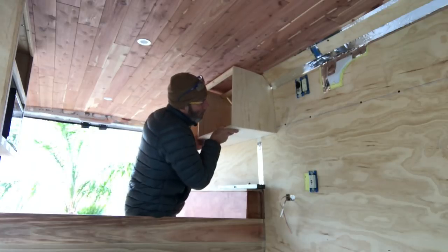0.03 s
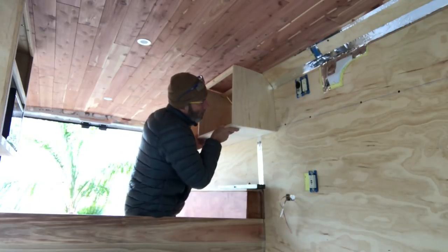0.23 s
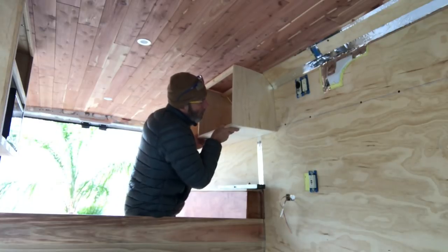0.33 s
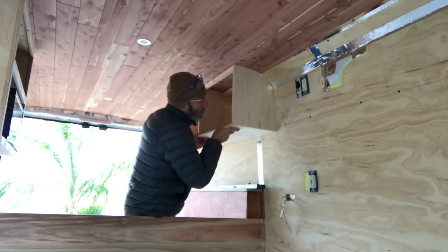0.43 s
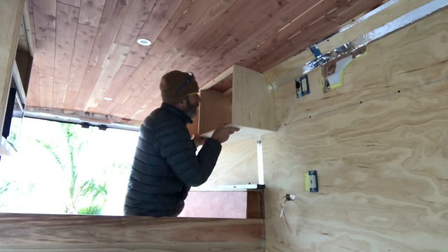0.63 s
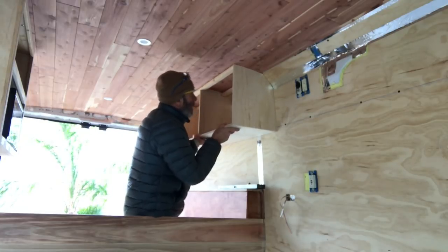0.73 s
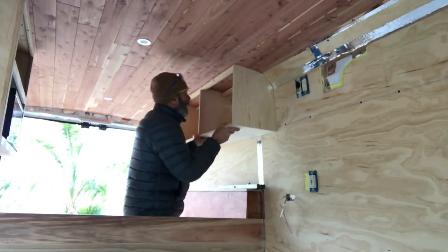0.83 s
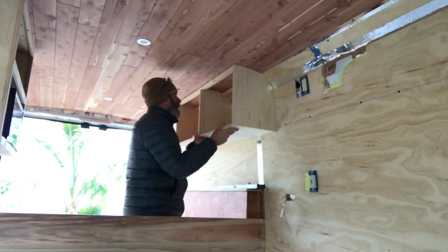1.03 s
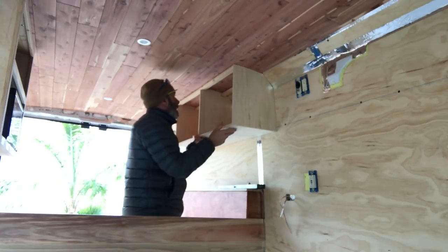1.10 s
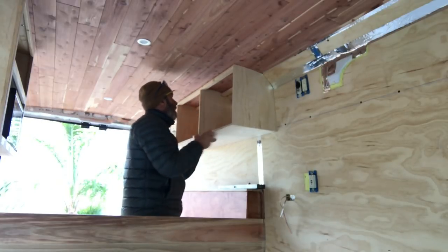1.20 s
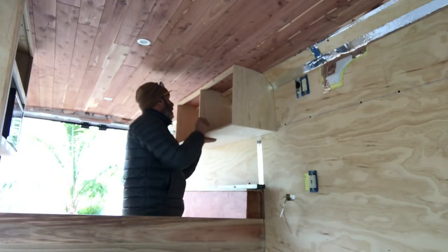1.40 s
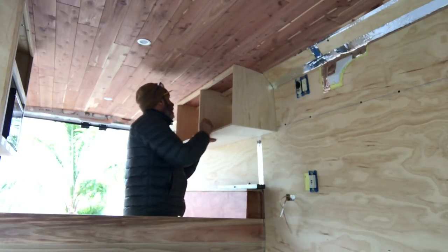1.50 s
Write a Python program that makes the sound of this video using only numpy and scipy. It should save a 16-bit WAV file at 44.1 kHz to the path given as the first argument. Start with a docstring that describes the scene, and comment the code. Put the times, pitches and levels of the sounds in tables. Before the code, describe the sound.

Two dull, clustered wooden knocks about a quarter second apart, with small scrapes around them, then quiet nylon rustling, low floor rumble and a late light tap over faint outdoor hiss; short dry room, mono microphone.

```python
"""Plywood box in a wooden cabin

A plywood box is pushed against the wall and ceiling of a small cabin: slips shake it and rasp, two knocks ring
box and panelling as sums of decaying modes, and light taps ring the pressed box. A padded jacket rustles in
shaped, patchy noise; floor and bodywork rumble in swelling low noise, over a quiet outdoor hiss.
A short decaying noise tail gives the room's answer to the wood.
"""
import sys
import numpy as np
from scipy import signal
from scipy.fft import rfft, irfft, next_fast_len
from scipy.io import wavfile
from scipy.ndimage import uniform_filter1d, map_coordinates

SR = 44100
rng = np.random.default_rng(int(sys.argv[2]) if len(sys.argv) > 2 else 0)


def output_pcm(signal):
    """Save a mono or channel-first signal as 16-bit PCM at the path in sys.argv[1].

    Samples are clipped to [-1, 1] before scaling.
    """
    pcm = np.clip(np.atleast_2d(signal).T, -1, 1) * 32767
    wavfile.write(sys.argv[1], SR, np.round(pcm).astype(np.int16))


def gain_from_db(level_db):
    """Convert decibel levels to linear amplitude factors (20 dB per decade)."""
    decades = np.asarray(level_db, float) / 20
    return 10 ** decades


N = 68355  # samples

# Contacts of the box with the panelling: t/s, box level/dB, wall level/dB, ceiling level/dB, contact/ms
CONTACTS = [(0.2269, -62, -24.5, -77, 0.41), (0.2308, -16.5, -27.5, -77, 1.06),
            (0.2405, -23.5, -24, -79, 1.36), (0.2571, -35, -33.5, -75, 0.48), (0.283, -37.5, -49, -78, 2.5),
            (0.467, -31.5, -68, -38.5, 0.38), (0.4731, -13.5, -63, -17, 1.47),
            (0.4807, -25, -40, -32.5, 0.37), (0.4955, -22.5, -62, -29.5, 1.07),
            (.518, -26.5, -79, -32, 1.35), (0.533, -47, -66, -35, 1.44), (0.604, -45.5, -78, -42, 2.1)]
# Modes of the hollow box, the wall panel and the ceiling boards: f/Hz, level/dB, t60/s
BOX_MODES = [(109, -13.5, 0.059), (250, 0, .14), (860.6, -20, 0.15), (1010, -16.5, 0.034), (1340, -17, .05)]
WALL_MODES = [(43.6, -34, 0.23), (176, -4.5, 0.23), (236, -11, 0.02), (310.5, 0.5, 0.048),
              (398, -13, 0.027), (673, -8.5, 0.04), (828, -6.5, 0.021), (950, -4, 0.013), (1105, -30, 0.11),
              (2230, -14, 0.047)]
CEILING_MODES = [(71.1, -9.5, 0.38), (151, 1.5, 0.046), (185.6, 1, 0.072), (384, -12, 0.077),
                 (578, -2.5, 0.058), (687, -4, 0.017), (1046, -7.5, 0.067), (1150, 0, .04),
                 (1320, -15.5, 0.082), (1556, -10, 0.17)]
# Dry crack of a contact, relative spectral density: f/Hz, level/dB
CRACK_SPECTRUM = [(200, -18), (500, -10), (1000, -21), (1700, -19.5), (2600, -43), (8000, -45),
                  (15000, -60)]
# Box sliding on wood: t/s, shudder level/dB, rasp level/dB
SLIDE_MOTION = [(0, -61.5, -53.5), (.05, -63, -66), (.075, -78, -66.5), (.145, -63, -77), (.17, -47.5, -59),
                (.2, -45.5, -59), (.215, -45, -50), (.225, -66, -53), (.25, -26, -46), (.265, -67, -53.5),
                (.28, -49.5, -84), (.39, -75, -84), (.41, -78, -60.5), (.44, -76, -50), (.462, -72, -50),
                (.475, -65, -46.5), (.51, -51, -63), (.56, -75, -69)]
# Rasp of the surface, relative spectral density: f/Hz, level/dB
RASP_SPECTRUM = [(300, -54), (600, -28), (1020, 2), (1400, -6), (2000, -10), (2900, -12), (4500, -20),
                 (9000, -29), (14000, -53)]
# Modes of the box pressed on the wall: f/Hz, level/dB, t60/s
PRESSED_BOX_MODES = [(268, 0, .09), (320, -2, .06), (440, -11, .04), (720, -15, .04)]
# Light taps of the box held against the wall: t/s, level/dB
LIGHT_TAPS = [(.011, -40), (0.034, -41.5), (.047, -55.5), (1.364, -43), (1.382, -55), (1.398, -48.5)]
# Decay of the cabin: f/Hz, t60/s
CABIN_DECAY = [(100, .18), (500, .13), (3000, .09)]
# Jacket movement: t/s, level/dB, tilt (treble over middle)/dB
JACKET_MOTION = [(0, -53, -2.5), (.04, -60, -5), (.09, -63, -4.5), (.2, -60.5, -4), (.235, -58, 15),
                 (.27, -71, -24), (.34, -60, -2), (.44, -58.5, 4), (.51, -64.5, -5), (.575, -57, 1),
                 (.595, -52.5, -1), (.62, -50.5, 2), (.655, -58, -3), (.8, -57.5, -3), (.82, -56.5, 3.5),
                 (.88, -56, 0), (.9, -60, -6.5), (.96, -57.5, -4), (.99, -52, 4.5), (1.018, -57.5, -1),
                 (1.048, -55, -4.5), (1.12, -60, -3), (1.155, -56.5, -5), (1.24, -57.5, 1.5),
                 (1.28, -54.5, 0.5), (1.33, -60.5, 0.5), (1.358, -54, -1), (1.376, -51.5, -1),
                 (1.424, -60, -4.5), (1.476, -52.5, 11), (1.514, -57.5, 8), (1.55, -56, 9)]
# Jacket cloth, relative spectral density: f/Hz, level/dB
CLOTH_SPECTRUM = [(150, -28.5), (300, -2.5), (600, -6.5), (900, -6.5), (1400, -8), (2200, -9.5),
                  (5800, -12.5), (15500, -24.5)]
# Low lumps of floor and bodywork: t/s, level/dB
RUMBLE_LEVEL = [(0, -50), (.09, -58), (.17, -67), (.25, -42), (.37, -48.5), (.41, -55), (.5, -35),
                (.62, -52.5), (.66, -53.5), (.85, -52.5), (.93, -54.5), (1.02, -55), (1.07, -56),
                (1.12, -49.5), (1.2, -64), (1.28, -50), (1.33, -74), (1.375, -44), (1.42, -64),
                (1.447, -45.5), (1.48, -70), (1.55, -45)]
# Tone of the rumble, relative spectral density: f/Hz, level/dB
RUMBLE_SPECTRUM = [(12, -25), (20, 5.5), (49, 8.5), (81, -2), (113, -20), (250, -13.5), (320, -58),
                   (550, -120)]
# Outdoor air, relative spectral density: f/Hz, level/dB
AIR_SPECTRUM = [(47, -7), (80, -2.5), (328, -16.5), (446, -39), (532, -18), (607, -16.5), (678, -21.5),
                (1100, -29), (1180, -18.5), (1280, -27), (3030, -31), (15500, -30.5)]
# Microphone colour: f/Hz, level/dB
MIC_COLOUR = [(4000, 1.5), (4900, -1), (5600, 0.5), (7000, 1), (8300, -2.5), (9400, -2), (10300, -5.5),
              (11300, -2.5), (14500, -5), (15600, -5)]

MODE_SCATTER_DB = 1  # standard deviation from contact to contact
CRACK_DB, CRACK_T60_S = -13.5, 0.087  # level against the loudest body
SLIPS_PER_S, SLIP_SPREAD_DB = 2500, 3
TAP_WIDTH_S = 0.000625  # from the peak of the push to 1/e
CABIN_DB, AIR_DB = -13, -59
CLOTH_SPLIT_HZ = 6600
MIC_LOW_HZ = 42.3


def unit(x):
    """x scaled to rms 1."""
    return x / np.sqrt(np.mean(x ** 2) + 1e-20)


def along(points, hz):
    """Reads (frequency, value) points on a log frequency axis."""
    f, v = np.transpose(points)
    return np.interp(np.log(hz + 1), np.log(f + 1), v)


def curves(rows):
    """One value per sample for each column after the time."""
    s, *columns = np.transpose(rows)
    return [np.interp(np.arange(N) / SR, s, column) for column in columns]


def wobble(rate):
    """A smooth random curve, rate knots a second."""
    knots = rng.standard_normal(int(N * 200 / SR) + 4)
    return map_coordinates(knots, [np.arange(N) * rate / SR])


def filtered(x, response):
    """x times a response of frequency."""
    size = next_fast_len(N + SR // 2)
    hz = np.fft.rfftfreq(size, 1 / SR)
    return irfft(rfft(x, size) * response(hz), size)[:N]


def coloured(x, spectrum):
    """x filtered by the given spectrum, rms 1."""
    return unit(filtered(x, lambda hz: gain_from_db(along(spectrum, hz))))


def patchy(patchy_db):
    """White noise with patches of random gain in time and frequency."""
    z = signal.stft(rng.standard_normal(N + 512), nperseg=256)[2]
    field = uniform_filter1d(rng.standard_normal(z.shape), size=5, axis=0)
    field = uniform_filter1d(field, size=8, axis=1)
    return signal.istft(z * gain_from_db(patchy_db * unit(field)), nperseg=256)[1][:N]


def ring(modes, scatter_db):
    """Answer of a wooden body to one unit blow; neighbouring modes start in opposite directions."""
    t = np.arange(SR // 2) / SR
    answer = np.zeros(len(t))
    for k, ((hz, db, t60), scatter) in enumerate(zip(modes, scatter_db)):
        decay = gain_from_db(db + scatter - 60 * t / t60)
        answer += (-1) ** k * decay * np.sin(2 * np.pi * hz * t)
    return answer


def knocks():
    """Rounded pushes ring box and panelling, with a dry crack; a longer contact is duller."""
    out, t = np.zeros(N + SR), np.arange(SR // 2) / SR
    bodies = (BOX_MODES, WALL_MODES, CEILING_MODES)
    scatter_db = MODE_SCATTER_DB * rng.standard_normal((len(CONTACTS), 3, len(WALL_MODES)))
    for (s, *levels_db, contact_ms), scatter in zip(CONTACTS, scatter_db):
        u = t[:SR // 50] / (contact_ms / 4000)  # time in quarters of the contact
        push = u ** 3 * np.exp(-1.5 * u)  # peaks halfway through the contact
        body = sum(gain_from_db(db) * ring(modes, row) for db, modes, row in zip(levels_db, bodies, scatter))
        crack = coloured(rng.standard_normal(N), CRACK_SPECTRUM)[:len(t)]
        crack *= gain_from_db(max(levels_db) + CRACK_DB - 60 * t / CRACK_T60_S)
        crack *= 1 - np.exp(-t / 0.0018)  # soft onset
        hit = signal.fftconvolve(body + crack, push / push.sum())
        out[round(s * SR):][:len(hit)] += hit
    return out[:N]


def slips():
    """Sparse impulses of random size and sign, as wood sticks and lets go."""
    size = rng.standard_normal(N) * gain_from_db(SLIP_SPREAD_DB * rng.standard_normal(N))
    gate = np.clip((SLIPS_PER_S / SR - rng.random(N)) * SR / 50, 0, 1)
    return unit(size * gate)


def slide():
    """Uneven slips shake the box in its modes and rasp on the surface."""
    shudder_db, rasp_db = curves(SLIDE_MOTION)
    body = ring(PRESSED_BOX_MODES, np.zeros(len(PRESSED_BOX_MODES)))
    shudder = signal.fftconvolve(slips() * gain_from_db(shudder_db), body / np.linalg.norm(body))[:N]
    rasp = coloured(patchy(patchy_db=2) + 0.45 * slips(), RASP_SPECTRUM)
    return shudder + rasp * gain_from_db(rasp_db + 0.5 * wobble(40))


def taps():
    """Soft touches ring the pressed box, mostly in its lowest notes."""
    blows = np.zeros(N)
    for s, db in LIGHT_TAPS:
        blows[round(s * SR)] = -gain_from_db(db)
    t = np.arange(SR // 100) / SR
    push = np.exp(-((t - 0.003) / TAP_WIDTH_S) ** 2)
    body = ring(PRESSED_BOX_MODES, np.zeros(len(PRESSED_BOX_MODES)))
    touch = signal.fftconvolve(body, push / push.sum())
    return signal.fftconvolve(blows, touch)[130:N + 130]  # takes out the 3 ms lead of the push


def cabin(x):
    """The small room's answer: a noise tail, each frequency dying at its own speed."""
    hz, t, z = signal.stft(rng.standard_normal(SR // 2), SR, nperseg=512)
    decay = gain_from_db(-60 * t / along(CABIN_DECAY, hz)[:, None])
    tail = signal.istft(z * decay, SR, nperseg=512)[1]
    delayed = np.pad(x, (200, 0))  # samples before the answer begins
    return signal.fftconvolve(delayed, tail / np.linalg.norm(tail))[:N]


def jacket():
    """Nylon rustle: middle and treble follow the movement, the tilt shifts between them."""
    level_db, tilt_db = curves(JACKET_MOTION)
    cloth = coloured(patchy(patchy_db=1.0), CLOTH_SPECTRUM)
    middle = filtered(cloth, lambda hz: 1 / (1 + (hz / CLOTH_SPLIT_HZ) ** 4))
    treble = cloth - middle
    rustle = middle * gain_from_db(-tilt_db / 2 + 0.66 * wobble(24.26))
    rustle += treble * gain_from_db(tilt_db / 2 + 0.52 * wobble(23.64))
    return rustle * gain_from_db(level_db + 1.12 * wobble(44.82))


def rumble():
    """Low lumps of noise from the floor and bodywork as weight shifts."""
    level_db, = curves(RUMBLE_LEVEL)
    return coloured(rng.standard_normal(N), RUMBLE_SPECTRUM) * gain_from_db(level_db + 1.5 * wobble(14))


def air():
    """Quiet outdoor hiss: shaped noise at a steady level, very slightly patchy."""
    return coloured(patchy(patchy_db=0.43), AIR_SPECTRUM) * gain_from_db(AIR_DB)


def scene():
    """The wood with its room answer, over jacket, rumble and air, in mono."""
    wood = knocks() + taps() + slide()
    room = gain_from_db(CABIN_DB) * cabin(wood)
    return (wood + room + jacket() + rumble() + air())[None]


def roll_off(x):
    """The treble ends steeply here."""
    return signal.sosfilt(signal.butter(12, 15610, fs=SR, output="sos"), x)


def record(dry):
    """Microphone colour and a second-order low cut."""
    def microphone(hz):
        low_cut = (1j * hz / (MIC_LOW_HZ + 1j * hz)) ** 2
        return gain_from_db(along(MIC_COLOUR, hz)) * low_cut

    mix = filtered(dry[0], microphone)[None]
    return roll_off(mix)


dry = scene()
out = record(dry)
output_pcm(out)
```